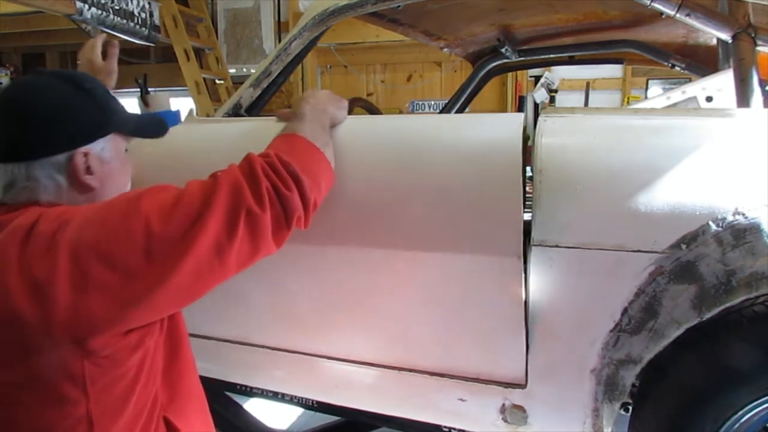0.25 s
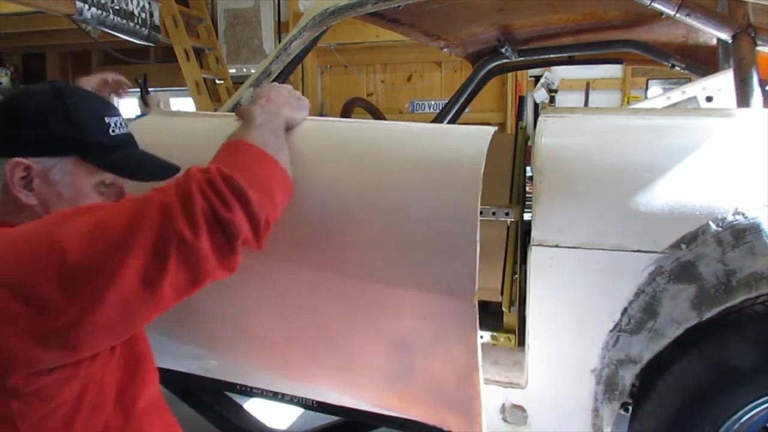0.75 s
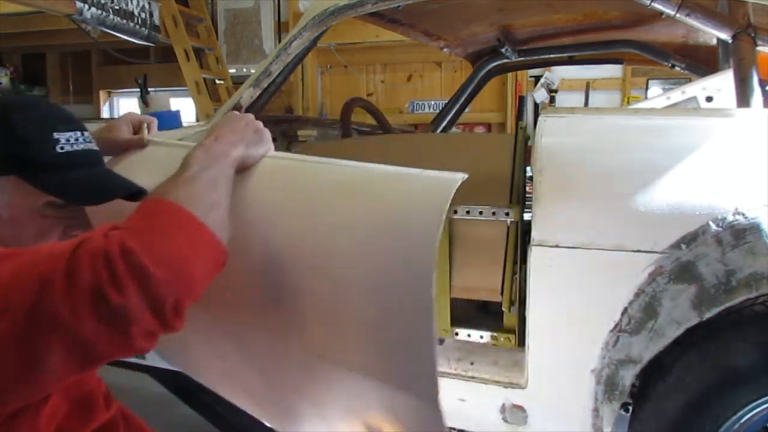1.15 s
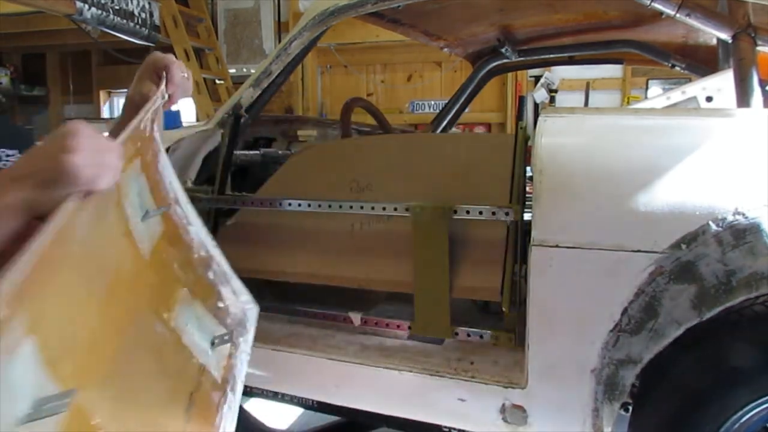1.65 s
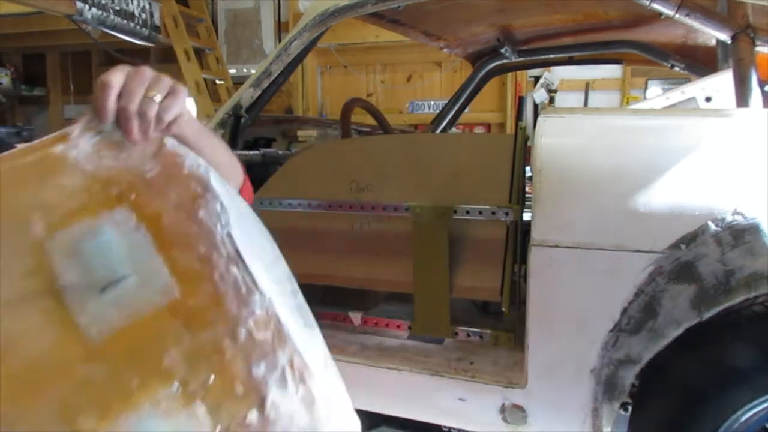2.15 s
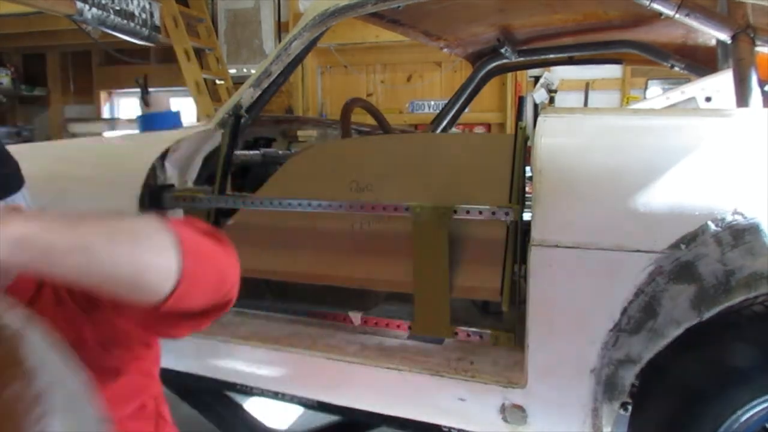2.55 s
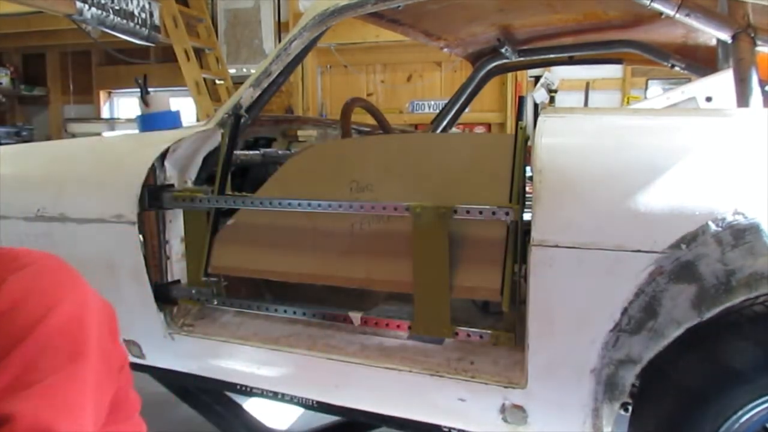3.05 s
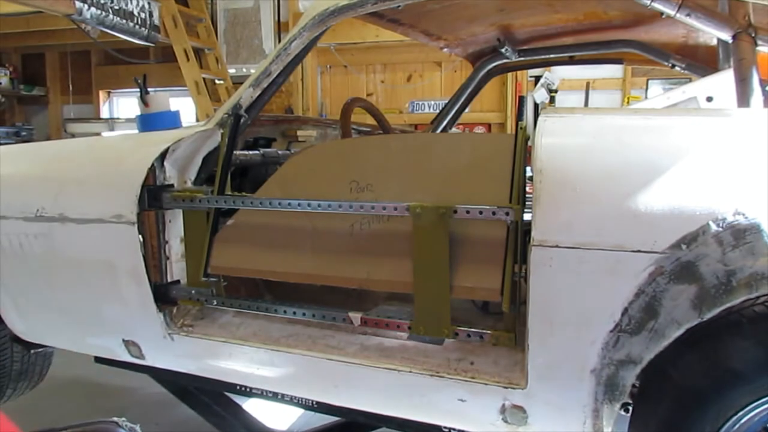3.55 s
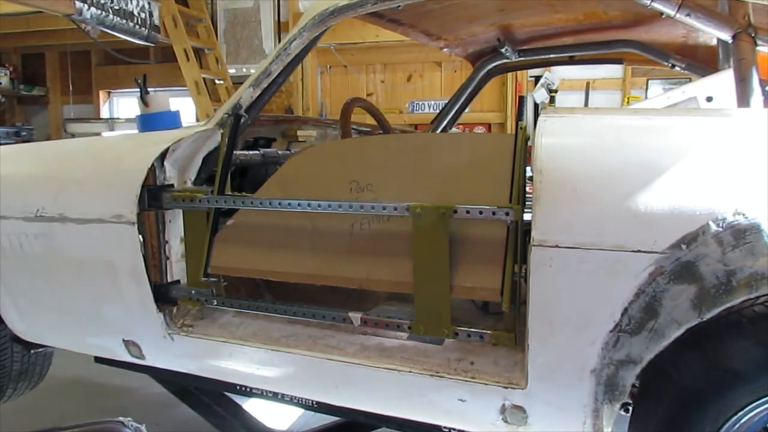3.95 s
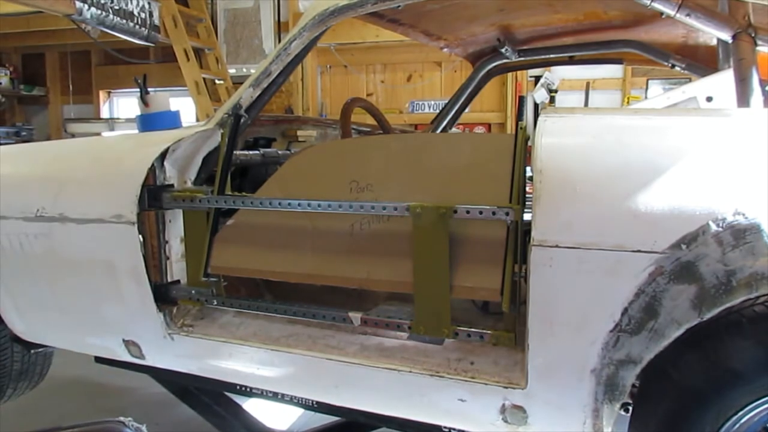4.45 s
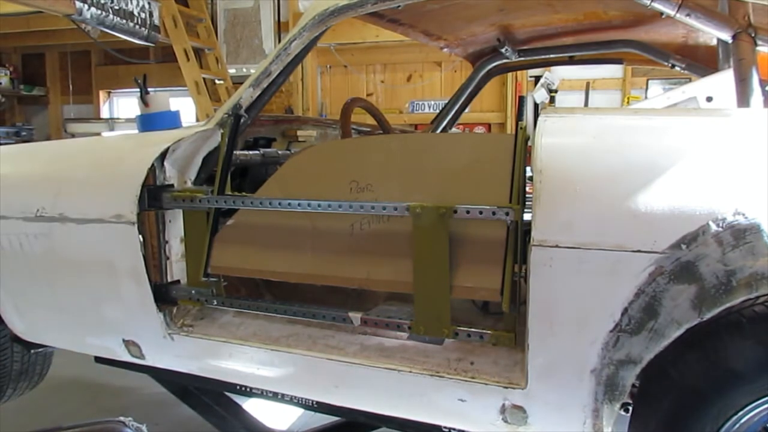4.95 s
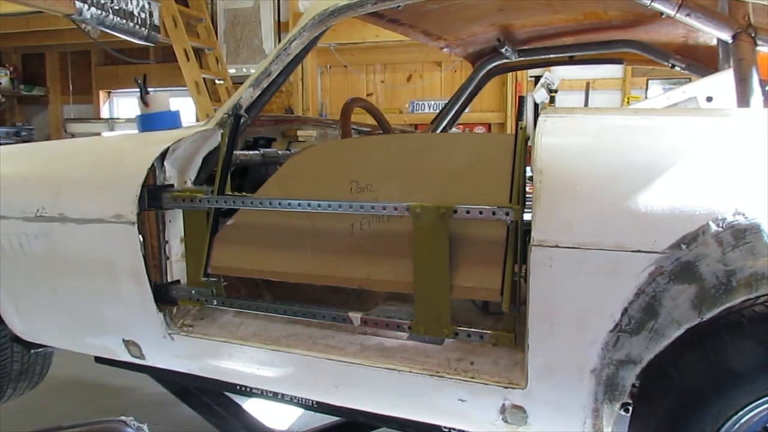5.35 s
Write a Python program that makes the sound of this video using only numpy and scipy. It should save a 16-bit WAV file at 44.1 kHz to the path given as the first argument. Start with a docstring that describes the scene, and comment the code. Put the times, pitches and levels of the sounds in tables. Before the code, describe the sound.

Fast hollow knocking and rubbing as a thin sheet panel comes off its frame, with brief squeaks and small clicks. Then lighter cloth rustle and soft wobbling while it is moved, a scuff or two, a dull thud, and one hard, boomy crack that dominates everything. A last soft double bump follows, then faint room tone. Close recording, short indoor reverberation.

```python
"""Fast knocks, judders and squeaks: a loose door panel is worked off its car frame in a wooden garage.
Sleeves swish and the sheet flexes as it is carried to the left; a shoe scuffs, and the panel is
set down with a thud, one sharp knock and a last soft bump. Blows ring a set of fading tones and noise,
booms are single fading tones, squeaks are unsteady tones, and all rubbing is noise shaped by slips.
The walls add a fading tail, over quiet air."""
import sys
import numpy as np
from scipy import signal
from scipy.fft import rfft, irfft, next_fast_len
from scipy.io import wavfile

SR = 44100
rng = np.random.default_rng(int(sys.argv[2]) if len(sys.argv) > 2 else 0)


def wav_out(sig):
    """Save sig, one row per channel (or a flat mono array), as 16-bit PCM at SR to the path in sys.argv[1]."""
    wavfile.write(sys.argv[1], SR, np.round(np.clip(np.atleast_2d(sig).T, -1, 1) * 32767).astype(np.int16))


N = 246959  # length of the scene in samples
TIME = np.arange(N) / SR  # seconds
EDGE_HZ = 15600  # the finished sound holds almost nothing above this


def amp(db):
    """Turns decibels into gain."""
    return 10 ** (np.asarray(db) / 20)


def unit(x, count=None):
    """Scales x so that its first count samples (or all of them) have an rms of 1."""
    return x / np.sqrt(np.mean(x[..., :count] ** 2) + 1e-20)


def read(points, hz):
    """Reads a table of (pitch_hz, value) between its points, on a log-frequency axis."""
    f, value = np.transpose(points)
    return np.interp(np.log(hz + 1), np.log(f + 1), value)


def add(mix, start_s, sound):
    """Mixes a stereo sound in at its start time."""
    part = mix[:, max(round(start_s * SR), 0):][:, :sound.shape[1]]
    part += sound[:, :part.shape[1]]


def noise(n, alike_hz=1900, most=1):
    """White noise at two close microphones: alike in the bass, unrelated in the treble."""
    a, b = rfft(rng.standard_normal((2, n)))
    same = min(most, 1) / (1 + (np.fft.rfftfreq(n, 1 / SR) / alike_hz) ** 2)
    right = same * a + np.sqrt(1 - same ** 2) * b
    return irfft(np.array([a, right]), n)


def colour(x, spectrum):
    """Filters x by a table of (pitch_hz, gain_db), then brings it to rms 1."""
    n = next_fast_len(x.shape[-1])
    gain = amp(read(spectrum, np.fft.rfftfreq(n, 1 / SR)))
    return unit(irfft(rfft(x, n) * gain, n)[..., :x.shape[-1]])


def cut(x, hz, kind):
    """A low-pass or high-pass of 12 dB an octave that never acts ahead of the sound."""
    hz = np.clip(hz, 20, SR / 2 - 100)
    return signal.sosfilt(signal.butter(2, hz, kind, fs=SR, output="sos"), x)


def wander(n, hz):
    """Random motion of rms 1 that heads for a new random value hz times a second."""
    t = np.arange(n) / SR * hz
    return unit(np.interp(t, np.arange(n), rng.standard_normal(n)))


def swell(peak_s, rise_s, fall_s):
    """The gain of one movement: it gathers speed, peaks and slows."""
    shape = 1.14  # 1 = pointed swell, 2 = rounded bell
    away = (TIME - peak_s) / np.where(TIME < peak_s, rise_s, fall_s)
    return np.exp(-np.minimum(abs(away), 20) ** shape)


def friction(per_s, slip_s, spread_db, smooth):
    """Random slips of uneven size, each a quickly dying burst of noise, over a smooth share."""
    sizes = amp(spread_db * np.minimum(rng.exponential(1, N), 3))
    slips = (rng.random(N) < per_s / SR) * sizes
    power = signal.lfilter([1], [1, -np.exp(-2 / (slip_s * SR))], slips ** 2)
    return noise(next_fast_len(N))[:, :N] * np.sqrt(power / power.mean() + abs(smooth))


def quiet_air():
    """The garage's quiet air: steady noise, strongest in the bass."""
    # colour of the air: (pitch_hz, gain_db)
    air_colour = [(25, -4.5), (45, -3.5), (70, 9), (110, -1), (200, -4.5), (400, -8), (1000, -22),
                  (2000, -17.5), (5000, -20), (11000, -22.5), (15500, -34)]
    level_db = -51.5
    return amp(level_db) * colour(noise(next_fast_len(N), most=0.72)[:, :N], air_colour)


def garage(x, first_s=0.0041):
    """A diffuse tail from the wooden walls: noise in which each band dies at its own speed."""
    # how long the walls ring: (pitch_hz, time to fall by 60 dB t60_s)
    wall_ring = [(100, 0.42), (300, 0.84), (1000, 0.66), (3000, 0.7), (8000, 0.28), (15000, 0.2)]
    hz, t, bands = signal.stft(noise(SR), SR, nperseg=256)
    fade = amp(-60 * t / read(wall_ring, hz)[:, None])
    tail = signal.istft(bands * fade, SR, nperseg=256)[1]
    tail = tail * (np.arange(tail.shape[1]) > first_s * SR)  # nothing returns before first_s
    return signal.fftconvolve(x, tail / np.linalg.norm(tail[0]), axes=1)[:, :N]


def slide():
    """Fine friction of sleeves, palms and soles: each stroke swells a bright swish and a duller rub."""
    # colour of the bright swish: (pitch_hz, gain_db)
    swish_colour = [(500, -35), (1500, -1.5), (3000, -3.5), (5000, 2.5), (7000, 1), (9500, 2), (11800, -2),
                    (13500, -9), (15500, -27)]
    # colour of the dull rub: (pitch_hz, gain_db)
    rub_colour = [(150, -5), (300, 0), (550, -2), (850, 4.5), (1150, 3), (1400, -2.5), (1750, -4.5),
                  (2400, -4), (4000, -13.5), (9000, -24)]
    # strokes of sleeves, palms and soles: (peak_s, rise_s, fall_s, swish_db, rub_db)
    strokes = [(0, .01, 0.076, -49, -53), (.79, 0.051, 0.039, -59, -52), (.96, 0.025, 0.15, -41, -44),
               (1.14, 0.15, 0.16, -39.5, -42.5), (1.79, 0.29, 0.069, -48, -72),
               (2.7, 0.33, 0.091, -59, -51.5), (3.02, 0.098, 0.054, -47.5, -52.5),
               (3.15, 0.11, 0.077, -40, -54), (3.275, 0.02, 0.054, -37, -36.5),
               (3.41, 0.097, 0.2, -50.5, -51), (3.975, 0.031, 0.12, -38, -41),
               (4.12, 0.12, 0.069, -38.5, -39.5), (4.31, 0.093, 0.057, -40.5, -41.5),
               (4.39, 0.087, 0.091, -34, -31), (4.86, 0.033, 0.17, -52.5, -45),
               (5.6, 0.12, .05, -64.5, -48.5)]
    # clothes rustle all through the carrying: (peak_s, rise_s, fall_s, swish_db, rub_db)
    rustle = (1.31, 0.35, 1.4, -54, -49)
    rest_swish_db, rest_rub_db = -66.5, -65  # faint rustle of standing still

    swish = colour(friction(per_s=900, slip_s=.0008, spread_db=2, smooth=1.6), swish_colour)
    rub = colour(friction(per_s=400, slip_s=.002, spread_db=2, smooth=1.2), rub_colour)
    swish_power, rub_power = amp(rest_swish_db) ** 2, amp(rest_rub_db) ** 2
    for *timing, swish_db, rub_db in [rustle, *strokes]:
        speed = swell(*timing)
        swish_power = swish_power + (amp(swish_db) * speed) ** 2
        rub_power = rub_power + (amp(rub_db) * speed) ** 2
    return swish * np.sqrt(swish_power) + rub * np.sqrt(rub_power)


def scuff(half_s, hz, octaves, db):
    """A quick stroke: a swell of grainy noise in one band, set by the surface and the stroke's speed."""
    n = next_fast_len(int(6 * half_s * SR))
    away = np.log2((np.fft.rfftfreq(n, 1 / SR) + 1) / hz) / octaves
    band = irfft(rfft(noise(n)) / (1 + away ** 4), n)
    grainy = unit(band * amp(2.0 * wander(n, 352)))
    return amp(db) * grainy * np.exp(-np.linspace(-3, 3, n) ** 2)


def drag(free_low_hz=190):
    """Coarse slips shake the panel's low resonances; once off the frame it loses its deepest boom."""
    # the edge drags, comes off the frame and settles: (time_s, level_db)
    drag_level = [(0, -35), (.3, -39), (.45, -31.5), (.68, -46.5), (1.2, -45.5), (1.5, -56), (3, -60),
                  (5.6, -72)]
    # colour of the dragging: (pitch_hz, gain_db)
    drag_colour = [(40, -4.5), (70, 2), (97, 7.5), (135, 8), (200, 2.5), (280, 5.5), (380, -3.5), (540, -6),
                   (630, -2), (800, -21.5), (1000, -37.5), (1500, -17), (3000, -29.5), (8000, -51)]
    # the sheet judders as the grip shifts or it takes its own weight: (peak_s, rise_s, fall_s, level_db)
    judders = [(1.85, .04, 0.018, -39.5), (1.98, 0.025, 0.23, -39.5), (2.29, 0.2, 0.12, -44.5),
               (3.43, 0.13, .11, -38.5), (4.06, 0.12, 0.17, -34.5), (4.57, 0.25, 0.13, -36)]

    slips = colour(friction(per_s=130, slip_s=0.002, spread_db=-1.0, smooth=0.9), drag_colour)
    free = np.interp(TIME, [.7, 1.1], [0, 1])  # 0 = on the frame, 1 = off it
    shaken = (1 - free) * slips + free * cut(slips, free_low_hz, "high")
    power = amp(np.interp(TIME, *np.transpose(drag_level))) ** 2
    for *timing, db in judders:
        power = power + (amp(db) * swell(*timing)) ** 2
    return shaken * np.sqrt(power)


def squeak(length_s, start_hz, end_hz, db, jitter=0.054, jitter_hz=900, fade_db=8):
    """The edge sticks and slips: a tone of unsteady pitch and level that starts sharply and fades."""
    u = np.linspace(0, 1, int(length_s * SR))  # 0 at the start, 1 at the end
    glide_hz = start_hz + (end_hz - start_hz) * u
    hz = glide_hz * (1 + jitter * wander(len(u), jitter_hz))
    level = amp(1.9 * wander(len(u), 293) - fade_db * u)
    tone = np.sin(2 * np.pi * np.cumsum(hz) / SR) * level
    return amp(db) * unit(tone * signal.windows.tukey(len(u), .1)) * np.ones((2, 1))


def tick(db, hz, t60, snap_db=-3, snap_t60=0.067, top_hz=12000):
    """Grit or a small fitting snaps: a burst of broad noise with a few short narrow rings."""
    # partials of a small steel part: (multiple of the main ring, level_db)
    fitting = [(0.492, -2.5), (.79, 0.5), (0.999, 5), (1.32, -3.5)]
    t = np.arange(SR // 4) / SR
    snap = cut(noise(len(t), alike_hz=4950), 810, "high") * amp(snap_db - 60 * t / snap_t60)
    ring = 0
    for multiple, level_db in fitting:
        f = hz * multiple
        if f < EDGE_HZ:
            narrow = signal.lfilter(*signal.iirpeak(f, f / 130, SR), noise(len(t)))  # 130 Hz wide
            ring = ring + amp(level_db) * unit(narrow)
    onset = 1 - np.exp(-t / 0.0005)
    sound = (snap + unit(ring) * amp(-60 * t / t60)) * onset
    return amp(db) * unit(cut(sound, top_hz, "low"), count=300)


def boom(hz, t60, db, rise_s=0.01):
    """The whole sheet flexes with a drum-like thump: a single low tone swells quickly and dies away."""
    t = np.arange(SR // 2) / SR
    fade = amp(db - 60 * t / t60)
    return np.sin(2 * np.pi * hz * t) * fade * (1 - np.exp(-t / rise_s)) * np.ones((2, 1))


def blow(db, low_hz, hard_hz, ring, crowd_db=-1.0, crowd_t60=0.68, clack_db=-2, clack_t60=0.074,
         rise_s=0.00037):
    """A blow rings the panel; hands and frame shorten it to clatter, a soft contact dulls it."""
    # the panel's main modes (its own ringing tones): (pitch_hz, level_db)
    modes = [(73, 1), (95, 0), (124, -3.5), (175, -2), (232, -3), (265, 3), (293, 1), (328, -4),
             (361, -6.5), (468, -6), (520, -15.5), (574, -21), (630, -13), (681, -9), (748, -9), (828, -5),
             (965, -5), (1049, -21.5), (1113, -18.5), (1185, -12.5), (1324, -37), (1814, -4), (1890, -12),
             (2030, -7)]
    # its crowd of weaker modes: (pitch_hz, gain_db)
    plate = [(40, -9), (90, 4), (280, 4.5), (400, 0), (700, -3.5), (1150, -4), (1500, -10.5), (2000, -14),
             (2600, -16.5), (5000, -11), (10000, -6), (15000, -42.5)]
    # how long the main modes ring unheld: (pitch_hz, time to fall by 60 dB t60_s)
    free_ring = [(100, 0.42), (320, 0.65), (600, 0.54), (2000, 0.35)]
    # clatter over the main modes: a clamped panel clacks, a free one sings
    held_db, free_db = 8.5, -3

    t = np.arange(SR) / SR
    tones = 0
    for hz, level_db in modes:
        fade = amp(level_db - 60 * t / (read(free_ring, hz) * ring))
        tones = tones + fade * np.sin(2 * np.pi * hz * t + rng.uniform(0, 2 * np.pi))
    # the dense weak modes give a quick clack over a longer fading crowd
    crowd_fade = amp(crowd_db - 60 * t / (crowd_t60 * ring))
    clack_fade = amp(clack_db - 60 * t / clack_t60)
    crowd = colour(noise(len(t)), plate) * (crowd_fade + clack_fade)
    clatter_db = held_db + (free_db - held_db) * ring
    sound = (unit(tones, count=900) + amp(clatter_db) * crowd) * (1 - np.exp(-t / rise_s))
    return amp(db) * unit(cut(cut(sound, low_hz, "high"), hard_hz, "low"), count=1300)


def carried(x):
    """The sound reaches the right microphone later as the panel moves left."""
    # the panel moves left: (time_s, head start of the left channel lead_s)
    lead = [(0, 0), (2, 0.00003), (4, 0.00012)]
    late_s = np.interp(TIME, *np.transpose(lead))
    return np.array([x[0], np.interp(TIME - late_s, TIME, x[1])])


def scene():
    """Panel, small contacts and friction in the garage, over its quiet air."""
    # quick strokes of sleeve, palm or sole: (peak_s, half_length_s, centre_hz, half_width_octaves, level_db)
    scuff_table = [(.962, 0.027, 1520, 0.36, -40.5), (1.13, 0.032, 10100, 0.37, -32),
                   (1.784, 0.049, 9100, 0.18, -51), (3.071, 0.027, 9500, 0.5, -41.5),
                   (3.294, 0.024, 1030, 0.68, -33.5), (3.348, 0.039, 920, 0.48, -41.5),
                   (3.414, 0.035, 170, 0.93, -55), (4.066, 0.074, 795, 0.11, -41.5)]
    # the edge sticking and slipping: (start_s, length_s, start_hz, end_hz, level_db)
    squeak_table = [(0.15, 0.027, 1850, 1830, -51), (.224, 0.03, 1454, 1428, -40.5),
                    (.225, .03, 1034, 1000, -40.5), (0.276, 0.03, 1414, 1510, -50),
                    (0.311, 0.0245, 1444, 1286, -46), (0.471, 0.16, 631, 643, -43),
                    (2.316, 0.0318, 540, 628, -39.5), (4.025, 0.13, 1790, 1727, -47.5),
                    (4.869, 0.072, 1773, 1707, -52.5)]
    # grit and small fittings snapping: (start_s, level_db, main_ring_hz, t60_s)
    tick_table = [(.087, -46, 9100, 0.036), (.316, -53, 5790, 0.37), (.335, -55, 11900, 0.14),
                  (.3905, -42, 3860, 0.0082), (.4854, -46.5, 3120, 0.46), (.487, -47.5, 3650, 0.094),
                  (.7144, -47, 1350, 0.032), (.7747, -46.5, 1700, 0.036), (.883, -45.5, 8500, 0.02),
                  (1.947, -43, 2400, 0.069), (1.953, -54, 4340, 0.35), (2.109, -46.5, 13700, .03),
                  (2.2145, -46.5, 4540, 0.019), (2.70, -50, 12200, 0.029), (3.356, -38.5, 1990, 0.062),
                  (3.4345, -39.5, 2190, 0.072), (3.4352, -38, 4290, 0.076), (3.5714, -45.5, 11650, 0.095),
                  (3.934, -44, 7400, 0.2), (3.9714, -33.5, 11200, 0.044), (4.3356, -23, 2740, 0.023),
                  (4.848, -45.5, 8100, 0.027), (4.9178, -44.5, 7800, 0.046)]
    # the sheet flexing, its pitch set by how it is held: (start_s, pitch_hz, t60_s, level_db before rise)
    boom_table = [(0.087, 113.5, 0.41, -27), (0.327, 98.2, 0.25, -25), (.424, 273.2, 0.48, -23),
                  (2.113, 251.4, 0.18, -26), (3.375, 237, 0.15, -25.5), (3.98, 236, 0.17, -10.5),
                  (4.341, 202, 0.091, -12.5), (4.837, 183, 0.19, -25)]
    # blows on the panel: (start_s, level_db, lowest_hz that the spot excites,
    # hardness_hz of the contact, ring as a share of the free ring)
    blow_table = [(0.002, -34.5, 161, 553, 0.37), (0.081, -28, 120, 700, 0.35),
                  (0.0874, -29.5, 666, 1070, 0.16), (0.107, -31, 200, 940, 0.38),
                  (0.137, -31.5, 436, 1030, 0.18), (0.159, -26.5, 250, 696, 0.35),
                  (0.191, -27.5, 90, 160, .54), (0.224, -40.5, 696, 1180, 0.095),
                  (0.311, -38.5, 546, 1190, .25), (0.3923, -27, 140, 1290, 0.39),
                  (0.428, -31.5, 120, 300, 0.25), (0.486, -41, 607, 1690, 1),
                  (0.714, -43.5, 497, 1700, 0.43), (0.775, -47, 686, 1500, 0.12),
                  (0.882, -41.5, 210, 1480, 1), (1.947, -40, 293, 2600, 0.12), (2, -55, 220, 1200, 0.37),
                  (2.162, -41, 200, 600, .2), (2.215, -44, 310, 1210, 0.41), (2.27, -43.5, 220, 450, 0.56),
                  (2.317, -43, 483, 604, 0.23), (3.104, -42.5, 81, 151, 0.32), (3.385, -45, 45, 100, 0.73),
                  (3.434, -41.5, 130, 1300, .23), (3.8057, -48.5, 166, 430, 0.5),
                  (3.981, -21.5, 200, 287, 0.95), (4.039, -35, 223, 400, 1), (4.3354, -9, 153, 1840, 0.27),
                  (4.344, -16.5, 104, 450, 0.27), (4.36, -13, 172, 700, 0.88),
                  (4.4267, -21.5, 239, 1110, 0.86), (4.48, -25, 246, 613, 0.74),
                  (4.836, -27, 170, 523, 0.83), (4.902, -28.5, 170, 342, 0.82), (4.96, -33, 128, 434, 0.86)]

    panel, small, scuffs = np.zeros((3, 2, N))
    for mix, table, source in [(panel, blow_table, blow), (panel, boom_table, boom),
                               (small, tick_table, tick), (small, squeak_table, squeak)]:
        for start_s, *row in table:
            add(mix, start_s, source(*row))
    for peak_s, *row in scuff_table:
        stroke = scuff(*row)
        add(scuffs, peak_s - stroke.shape[1] / SR / 2, stroke)
    panel = carried(panel)
    rubbing = drag() + slide() + scuffs
    # the panel's low ring comes mostly directly; the walls return mainly its higher sound
    panel_high = cut(panel, 390, "high")
    room = garage(amp(-9.5) * panel_high + amp(-7.5) * small + amp(-8.5) * rubbing)
    balance = amp([[.35], [-.35]])  # left slightly up, right slightly down, in dB
    return (panel + small + rubbing + room + quiet_air()) * balance


def record(dry):
    """The loudest peaks are rounded off at full scale; then the treble above EDGE_HZ is removed."""
    rounded = dry / (1 + dry ** 6) ** (1 / 6)
    low_pass = signal.firwin(511, EDGE_HZ, window=("kaiser", 9), fs=SR)
    return signal.oaconvolve(rounded, low_pass[None], "same")


dry = scene()
out = record(dry)
wav_out(out)
```